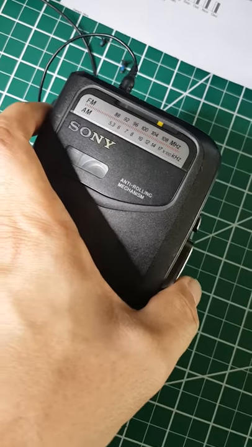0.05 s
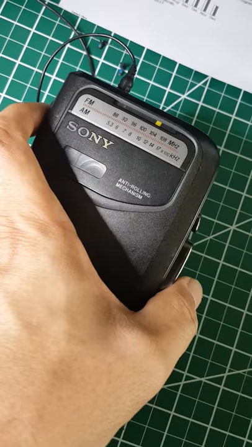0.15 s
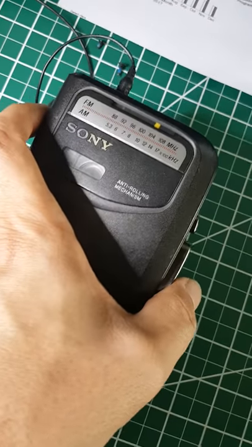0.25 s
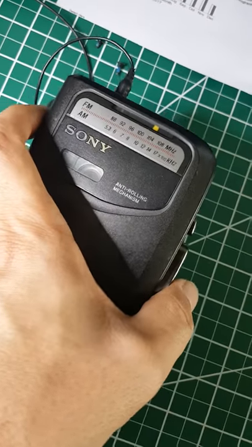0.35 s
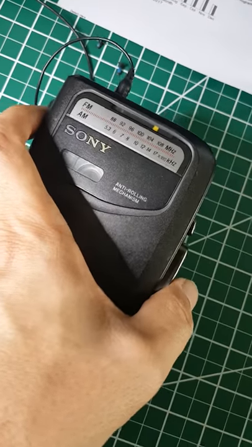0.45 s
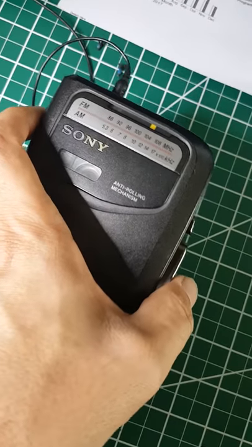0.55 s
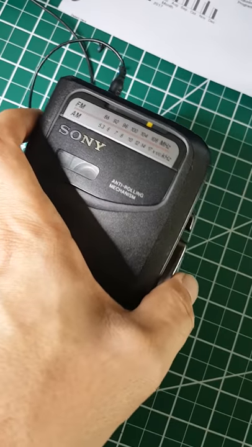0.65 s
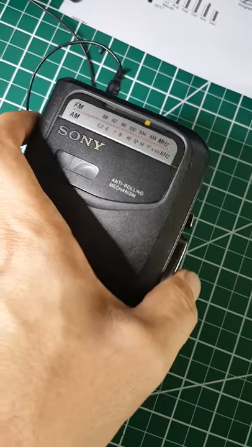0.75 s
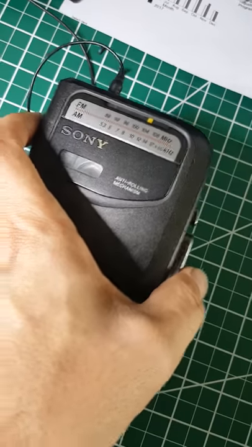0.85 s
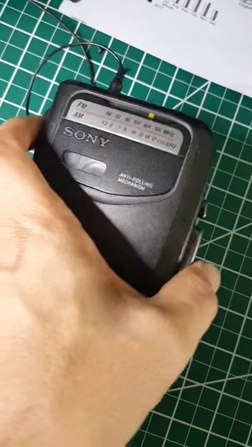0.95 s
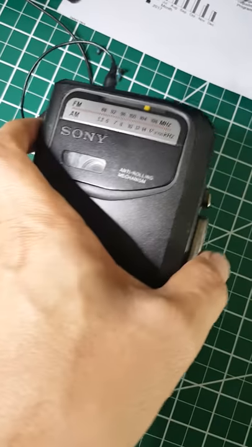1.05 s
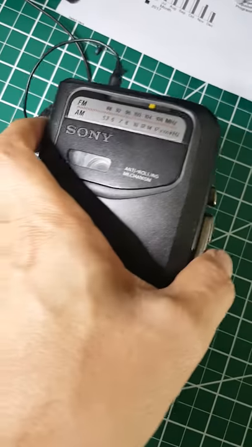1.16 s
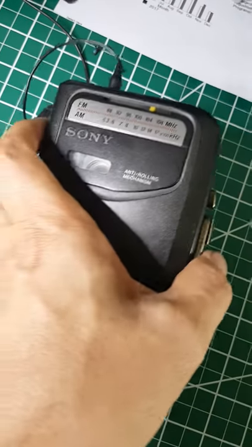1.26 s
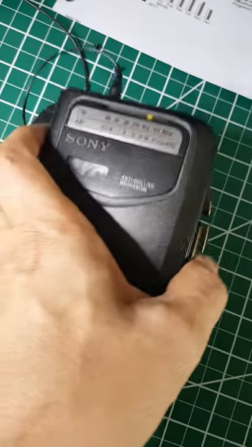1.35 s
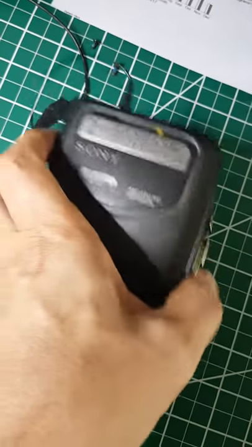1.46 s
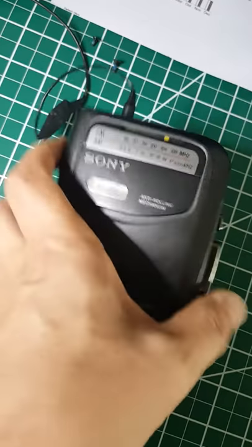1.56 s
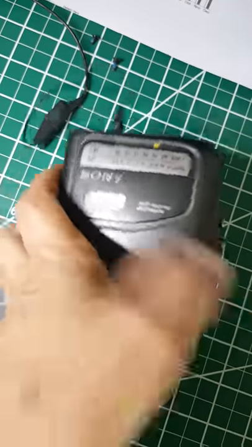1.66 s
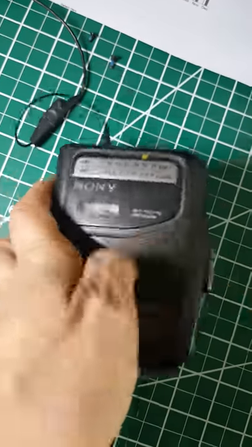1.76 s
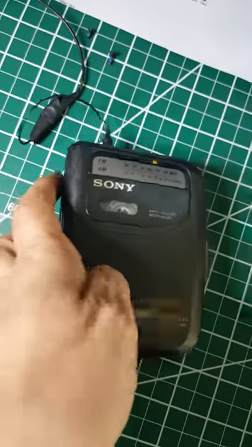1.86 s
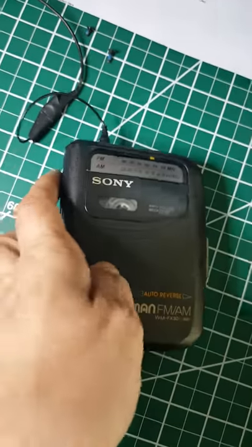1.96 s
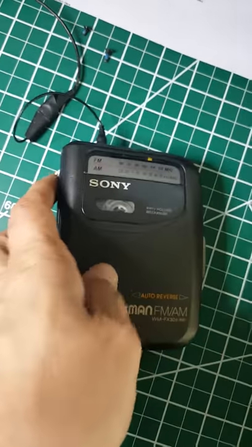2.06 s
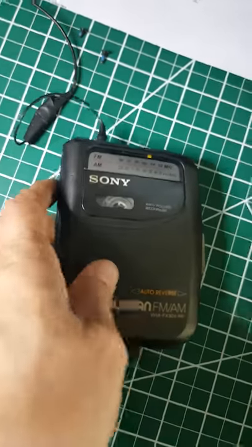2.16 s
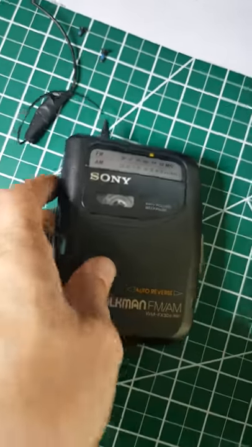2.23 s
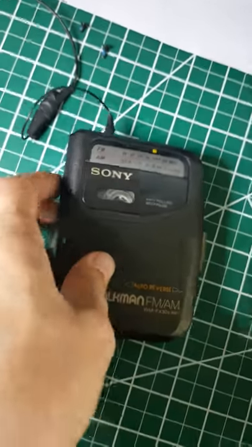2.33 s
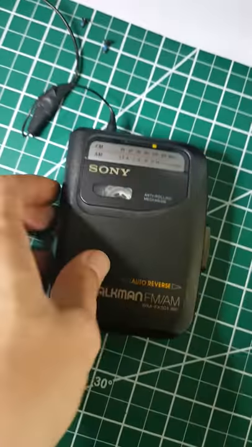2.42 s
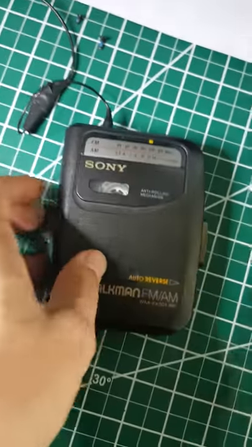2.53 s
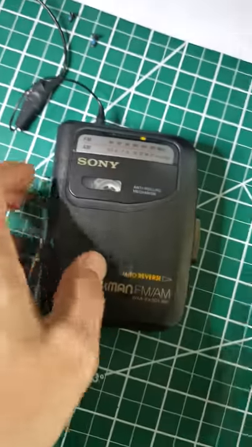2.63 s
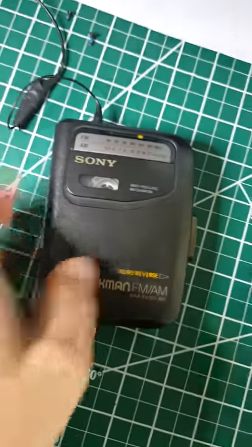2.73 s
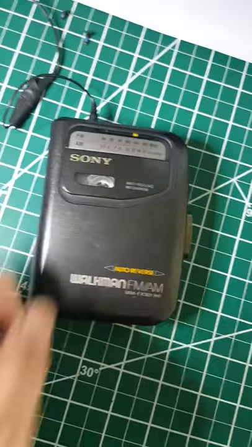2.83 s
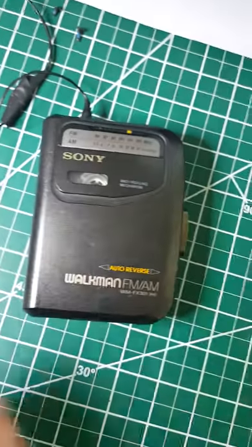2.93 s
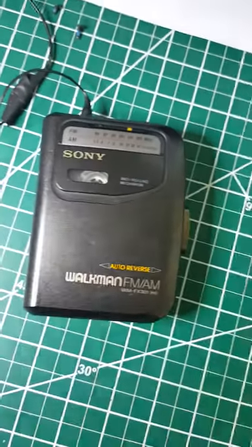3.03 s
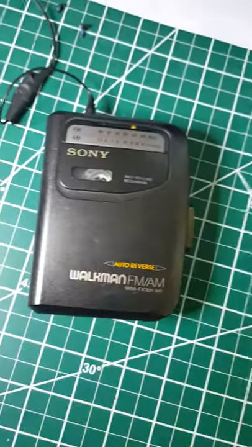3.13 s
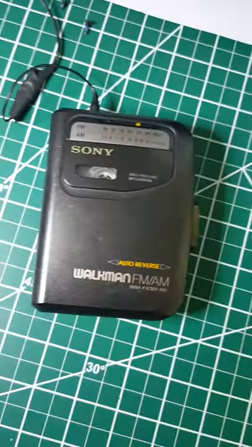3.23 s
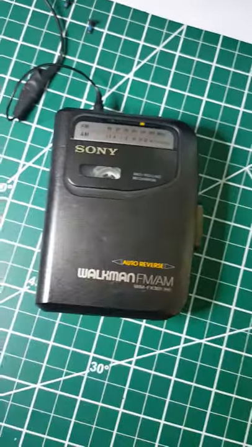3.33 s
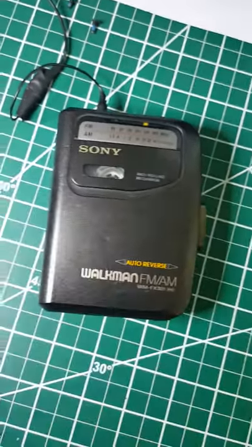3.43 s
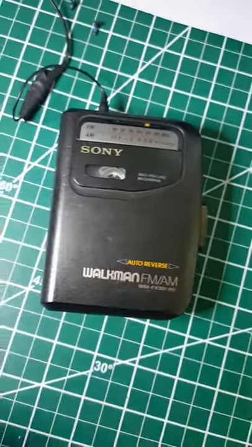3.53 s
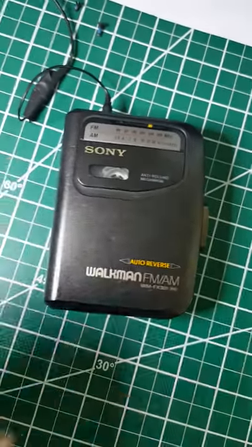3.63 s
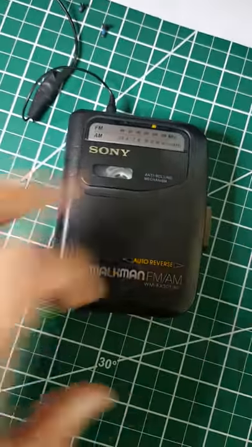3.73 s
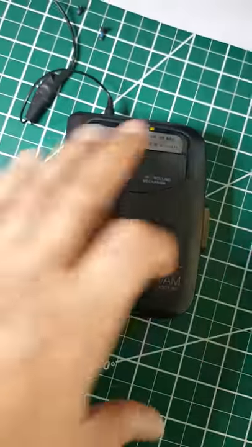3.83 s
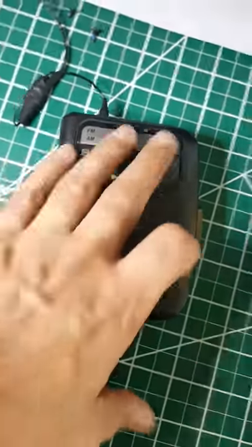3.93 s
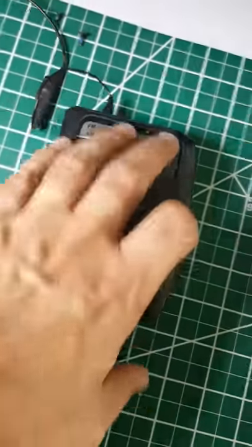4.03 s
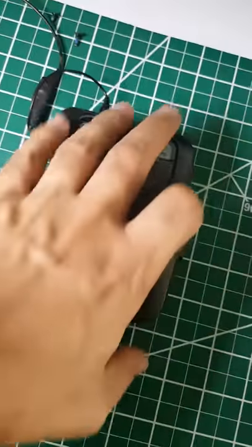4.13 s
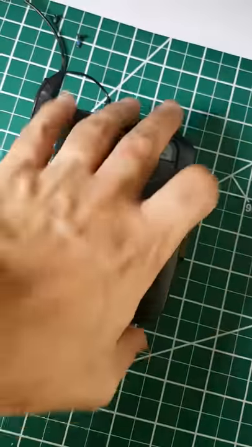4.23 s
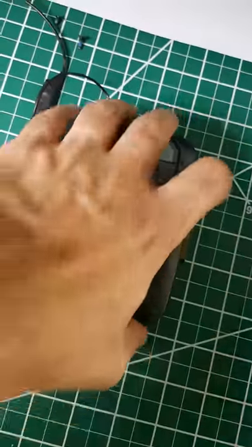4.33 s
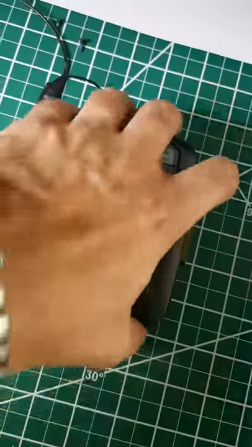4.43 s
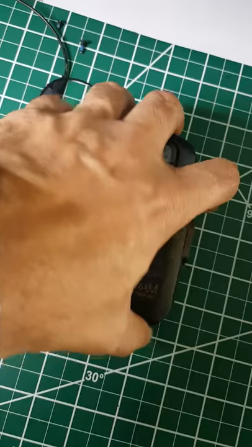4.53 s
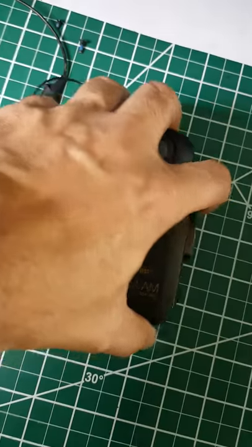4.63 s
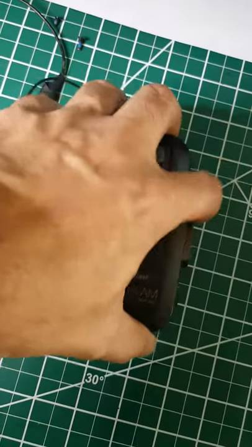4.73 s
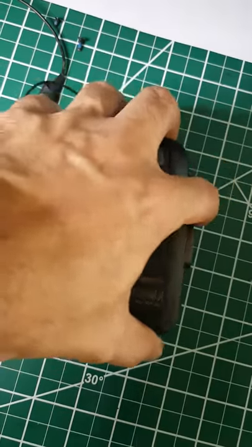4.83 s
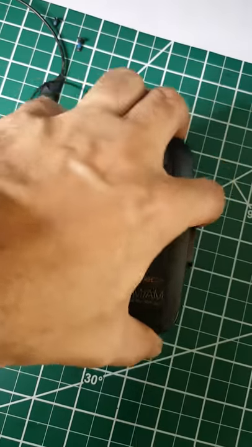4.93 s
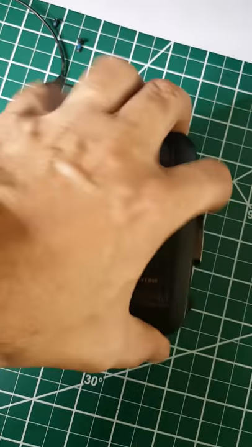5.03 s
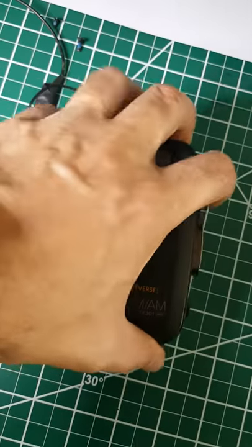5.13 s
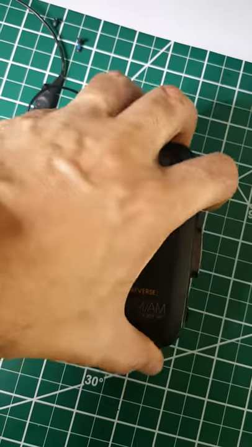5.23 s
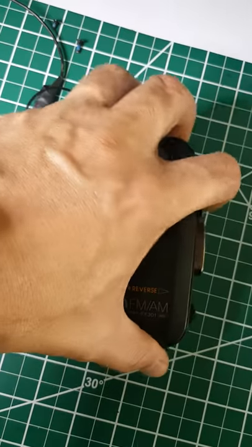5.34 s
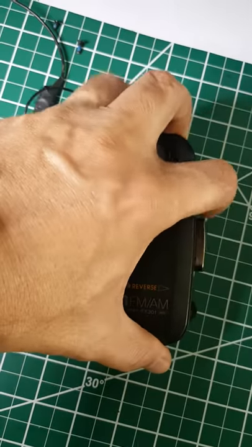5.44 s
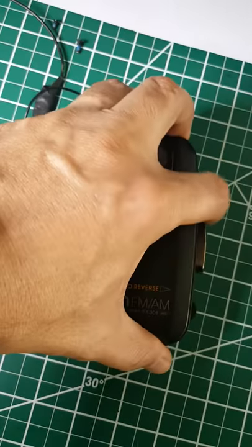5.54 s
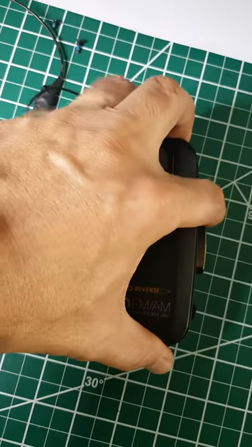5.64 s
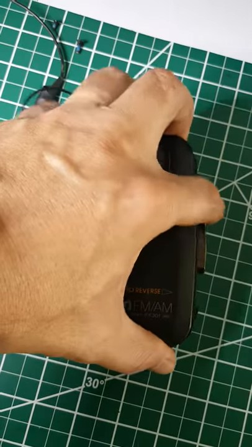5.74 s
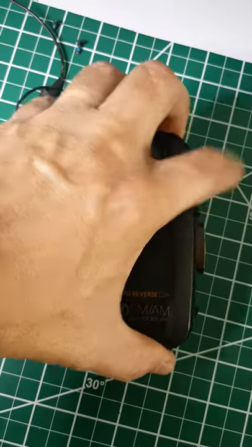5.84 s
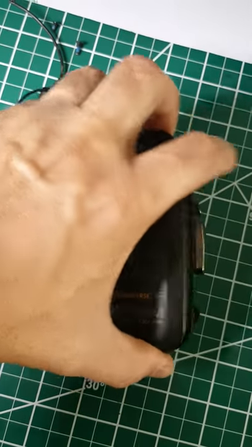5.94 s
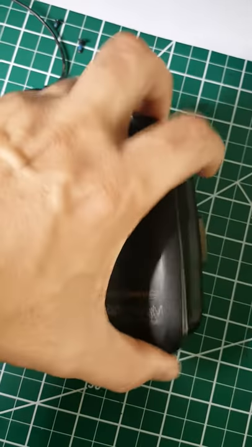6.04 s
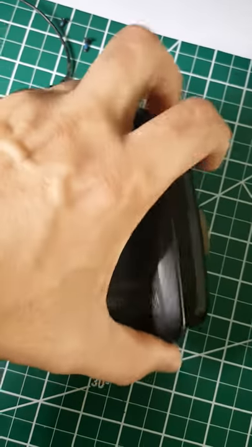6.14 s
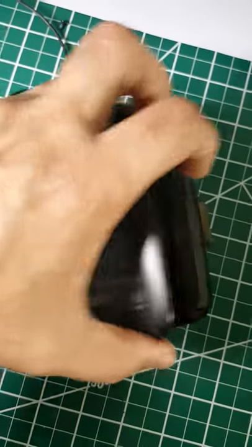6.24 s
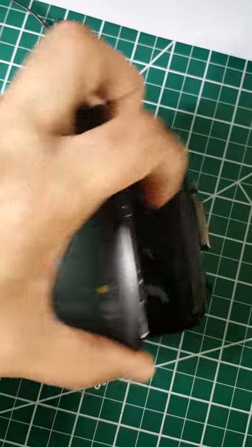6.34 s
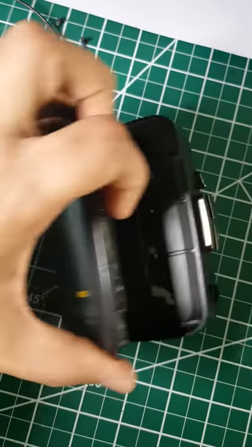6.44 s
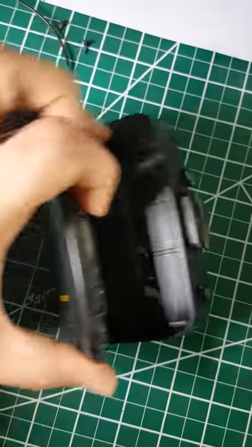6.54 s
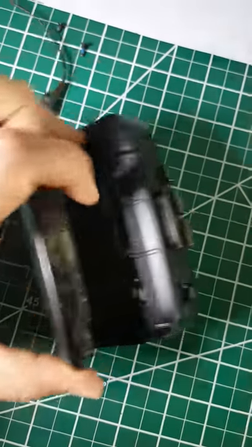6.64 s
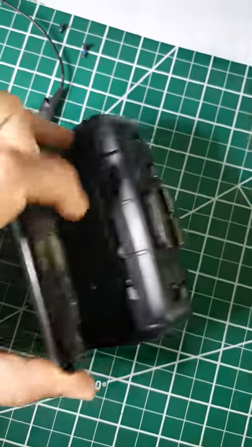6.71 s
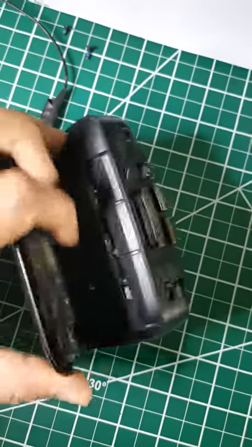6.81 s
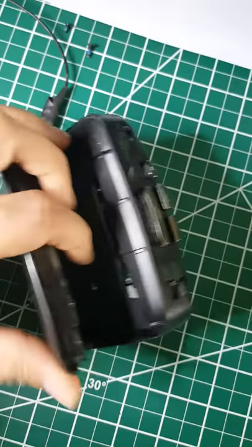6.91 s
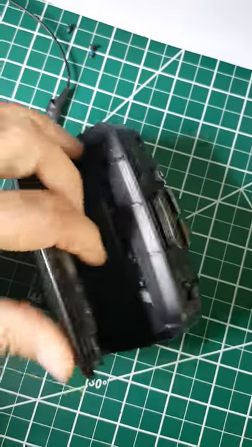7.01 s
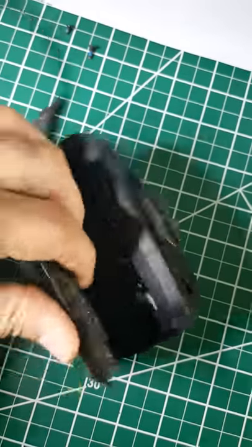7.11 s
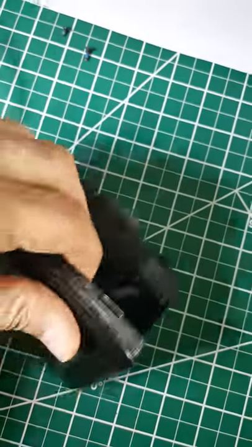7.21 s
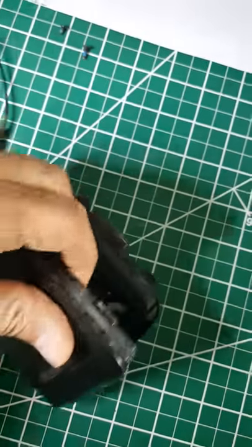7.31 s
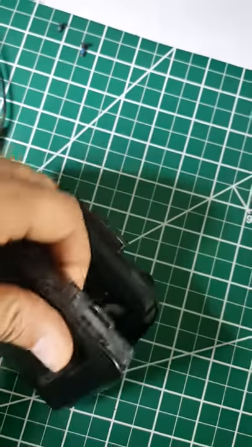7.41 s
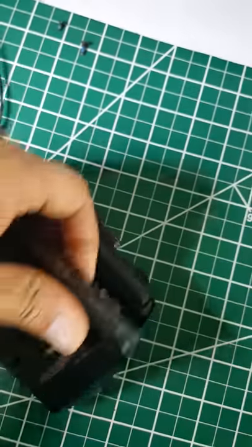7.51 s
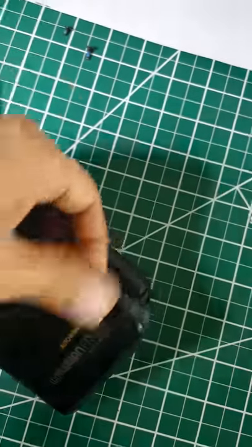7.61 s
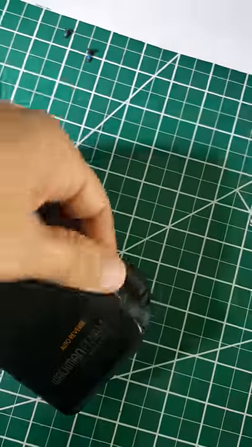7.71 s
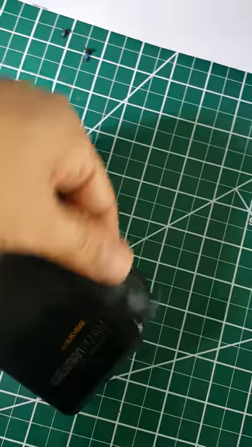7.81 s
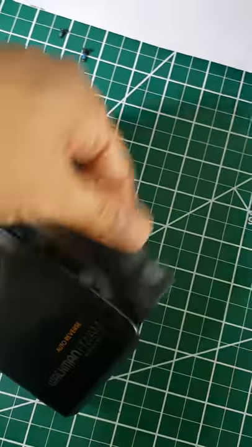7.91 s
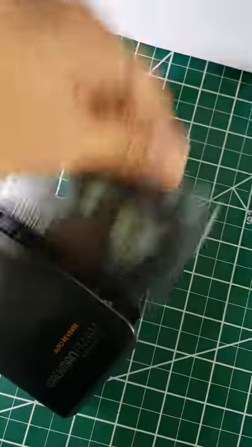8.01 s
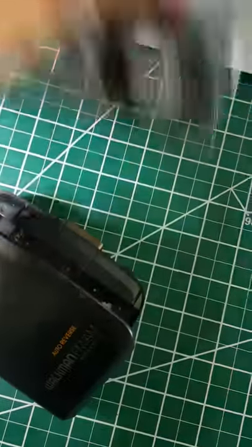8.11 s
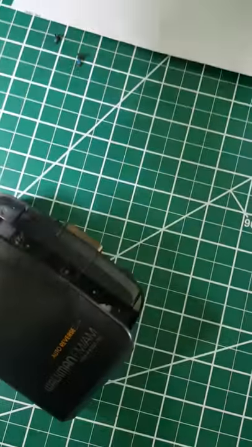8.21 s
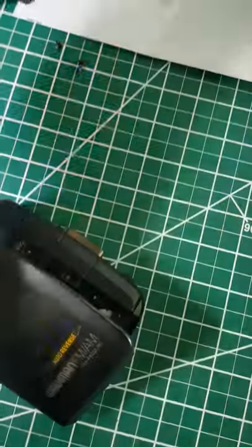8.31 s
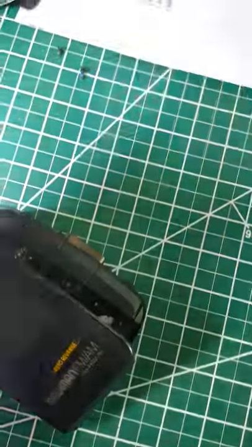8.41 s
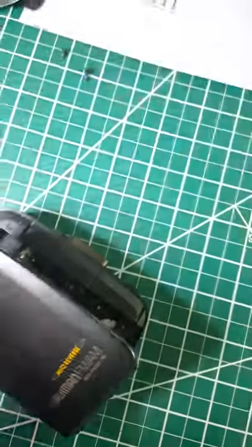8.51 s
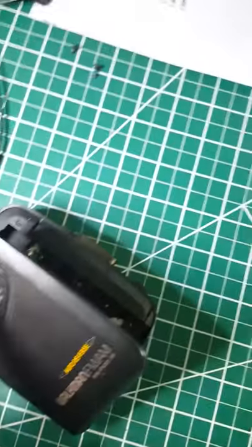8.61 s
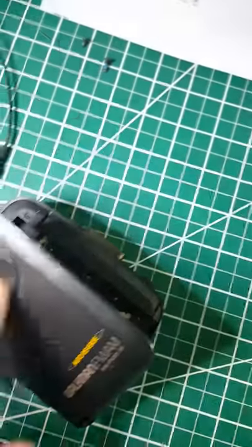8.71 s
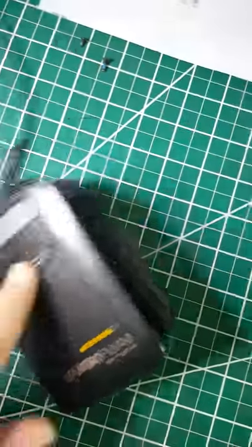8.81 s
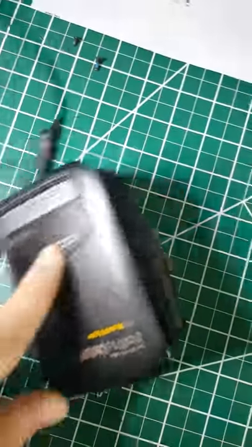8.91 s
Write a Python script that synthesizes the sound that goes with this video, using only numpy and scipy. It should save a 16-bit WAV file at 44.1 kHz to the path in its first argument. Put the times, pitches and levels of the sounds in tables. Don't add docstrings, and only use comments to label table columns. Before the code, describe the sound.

Steady tape hiss stops with a click; a hard plastic knock on a matted desk, light ticks, a sharp lid snap, then rattly handling.

```python
import sys
import numpy as np
from scipy import signal
from scipy.fft import rfft, irfft, next_fast_len
from scipy.io import wavfile

SR = 44100
rng = np.random.default_rng(int(sys.argv[2]) if len(sys.argv) > 2 else 0)


def inscribe(sig):
    pcm = np.round(np.clip(np.atleast_2d(sig).T, -1, 1) * 32767)
    wavfile.write(sys.argv[1], SR, pcm.astype(np.int16))


def rack_gain(trim_db):
    fader = np.asarray(trim_db, float)
    return 10 ** (fader / 20)


N = 395331

# frequency in Hz, level in dB, decay time T60 in seconds.
CASE_MODES = [(946, -8.5, 0.15), (1150, -4, 0.028), (1590, 5, 0.073), (1900, -2, 0.022),
              (2180, -6.5, 0.081), (2477, 4, 0.014), (4635, -32, 0.014)]
# frequency in Hz, level in dB, extra T60 in seconds.
SHELL_MODES = [(362, 0.5, 0.079), (600, -6, 0.016), (1000, -4.5, 0.02), (2000, 3.5, 0.021),
               (3000, 1, 0.023), (5400, -4.5, 0.03), (8640, -7.5, 0.031), (10400, -22, 0.011),
               (15200, -19.5, 0.035)]


def contacts():
    # start in seconds,
    # peak in dB, hardness in dB, weight in dB, loudest ring in Hz, chatter length in seconds.
    case_contacts = [(1.217, -45.5, -17, -3, 690, 0.0042), (1.32, -19.5, -12, -8.5, 1960, 0.002),
                     (1.426, -55, -27.5, -9, 1780, 0.0063), (1.477, -42, -15, -5, 2020, 0.013),
                     (1.499, -45, -18.5, -16, 940, 0.012), (1.538, -38.5, -22, -9, 760, 0.0039),
                     (1.753, -55, -21.5, -17, 970, 0.0061), (1.903, -4.5, -20, -12.5, 975, 0.0017),
                     (2.055, -31, -16, -10, 1680, 0.0027), (2.122, -31.5, -17, -22, 976, 0.0038),
                     (2.215, -44, -37.5, -10, 1590, 0.0028), (2.247, -28.5, -19, -18, 1900, 0.0017),
                     (2.272, -32, -17, -25, 890, 0.0017), (2.357, -30, -26.5, -23, 630, 0.015),
                     (2.381, -20.5, -27, -40, 850, 0.0074), (2.402, -14.5, -22, -27, 1227, 0.004),
                     (2.55, -51, -29, -12.5, 1330, 0.0058), (2.926, -54, -34, 2, 624, 0.0054),
                     (2.979, -60, -31.5, -8.5, 690, 0.0057), (3.934, -20.5, -24, -15.5, 900, 0.0042),
                     (4.33, -51, -24.5, -11.5, 960, 0.005), (4.357, -38.5, -35, -13, 930, 0.0058),
                     (4.454, -44.5, -14.5, -13.5, 1000, 0.0037), (4.511, -40.5, -45, -19, 1720, 0.0025),
                     (4.563, -44.5, -12, -36, 860, 0.0045), (4.588, -33.5, -55, -35, 940, 0.0035),
                     (4.62, -44, -16.5, -24, 1620, 0.01), (4.655, -37.5, -23, -33, 2160, 0.0034),
                     (4.677, -38, -52, -32, 1890, 0.0081), (4.769, -31, -23.5, -32, 2150, 0.0017),
                     (4.839, -29.5, -14.5, -46, 915, 0.0017), (4.9, -29.5, -18, -27, 925, 0.0023),
                     (4.944, -17, -21.5, -25, 1590, 0.0017), (5.002, -23.5, -59, -15, 2030, 0.0044),
                     (5.076, -28, -67, -15, 2180, 0.003), (5.151, -23.5, -18.5, -39, 2090, 0.0019),
                     (5.227, -54, -28.5, -15, 926, 0.005), (5.306, -40, -21.5, -20, 2180, 0.0021),
                     (5.37, -30, -17, -34, 2020, 0.0035), (5.433, -38, -21.5, -40, 940, 0.0093),
                     (5.468, -37.5, -20, -25, 1520, 0.0036), (5.499, -37.5, -16, -22, 1520, 0.0026),
                     (5.539, -38, -21, -26, 2210, 0.0035), (5.559, -39, -32, -23, 1880, 0.005),
                     (5.581, -31.5, -25.5, -36, 1620, 0.0021), (5.658, -27, -19, -14, 1830, 0.0022),
                     (5.682, -28.5, -20, -17, 1430, 0.013), (5.708, -27, -16.5, -42, 1570, 0.005),
                     (5.823, -26.5, -17, -42, 1950, 0.0017), (5.996, -26.5, -16, -20, 1644, 0.0046),
                     (6.04, -26.5, -14.5, -18, 1580, 0.013), (6.07, -3.5, -12, -20.5, 2530, 0.009),
                     (6.183, -19.5, -12.5, -36, 1590, 0.0017), (6.209, -20.5, -29, -13.5, 1224, 0.0081),
                     (6.283, -37, -35, -6, 1510, 0.0037), (6.394, -38, -17, -16, 1130, 0.015),
                     (6.434, -11.5, -3, -13.5, 1456, 0.0031), (6.701, -46, -20, -5.5, 1130, 0.0091),
                     (6.747, -44.5, -21.5, -14, 1040, 0.005), (6.822, -35.5, -18.5, -14, 1220, 0.01),
                     (6.868, -40.5, -24, -24, 1190, 0.005), (6.894, -42, -26.5, -26, 1210, 0.005),
                     (6.981, -49.5, -27, -24, 974, 0.005), (7.021, -60.5, -19, -16, 816, 0.005),
                     (7.073, -34, -17.5, -30, 930, 0.015), (7.153, -22, -11.5, -26, 2420, 0.0027),
                     (7.243, -36, -14, -26, 2970, 0.0074), (7.244, -19, -13.5, -45, 1500, 0.014),
                     (7.28, -31.5, -13.5, -29, 1510, 0.0055), (7.29, -19.5, -22.5, -32, 1510, 0.0074),
                     (7.569, -34.5, -21, -12, 1220, 0.0043), (7.639, -32, -12.5, -24, 1600, 0.0045),
                     (7.691, -49, -12.5, -14, 1420, 0.005), (7.712, -40, -33, -13, 1400, 0.003),
                     (7.755, -38, -22.5, -15, 1440, 0.015), (7.784, -23.5, -17.5, -38, 1200, 0.014),
                     (7.816, -28, -27.5, -27, 2630, 0.015), (7.852, -25.5, -22, -21, 1180, 0.015),
                     (7.934, -24, -29, -33, 1150, 0.0079), (7.949, -18.5, -27, -23, 1030, 0.011),
                     (8.01, -21.5, -23, -14, 1100, 0.0078), (8.2, -34, -8, -30, 1840, 0.0025),
                     (8.224, -41.5, -20.5, -20, 1710, 0.015), (8.256, -24, -16, -41, 1500, 0.0024),
                     (8.333, -50, -11, -19, 1380, 0.005), (8.524, -36.5, -33.5, -20, 810, 0.0066),
                     (8.572, -35, -15, -22, 1420, 0.005), (8.583, -26, -17, -20, 1460, 0.0034),
                     (8.602, -17, -11.5, -17, 1800, 0.0017), (8.757, -37.5, -6, -16, 1640, 0.015),
                     (8.84, -34.5, -10, -4, 1590, 0.015), (8.887, -37, -14, -26, 1190, 0.0084),
                     (1.359, -38, -22, -21, 1030, 0.0041), (1.679, -55, 1, 0, 654, 0.0055),
               (2.429, -29.5, -16.5, -10, 825, 0.0054), (2.519, -46, -16, -19, 613, 0.0034),
               (3.099, -51, -20.5, -7.5, 600, 0.005), (4.757, -37, -24, -36, 2230, 0.0057),
               (5.164, -29.5, -25, -19, 1550, 0.0033), (5.389, -40.5, -22, -30, 2010, 0.015),
               (5.721, -21.5, -19.5, -19, 1570, 0.0068), (5.739, -27.5, -12, -23.5, 1730, 0.0039),
               (6.073, -10, -17.5, -25, 1640, 0.005), (6.087, -13.5, -10, -24.5, 1510, 0.0064),
               (6.107, -13.5, -11.5, -23, 1540, 0.005), (6.627, -49, -13, -20, 724, 0.0036),
               (7.234, -28.5, -2.5, -9, 1460, 0.0049), (7.312, -33.5, -22.5, -30, 1630, 0.005),
               (7.874, -25, -23.5, -31, 1240, 0.007), (8.029, -27.5, -27.5, -34, 1570, 0.0047),
               (8.279, -43, -7, -21, 1500, 0.0033)]
    shell_likeness = 0.46
    size = 8192
    out = np.zeros((2, N + size))
    t = np.arange(3500) / SR
    bands = shell_bands(count=18)
    hz = bands[:, :1]
    case = responses(CASE_MODES, size)
    thicket = responses(bands, size)
    extra_t60 = at_hz(np.array(SHELL_MODES)[:, ::2], hz)
    alike = np.clip(shell_likeness, 0, 1) ** (hz / 1500)

    for s, peak_db, hard_db, weight_db, ring_hz, chatter_s in case_contacts:
        chatter_s = np.clip(chatter_s, .0005, .03)
        force = slips(len(t), 5000, uneven_db=3.0) * np.exp(-t / chatter_s) * 0.44
        force[0] = 1.0
        loose = signal.lfilter([1], [1, -.985], np.abs(slips(len(t), 450, uneven_db=3.0)))
        build_up = 1 - np.exp(-t / (0.27 * chatter_s))
        rattle = build_up * (.5 + .35 * loose + np.abs(force))

        point_db = 5.5 * rng.standard_normal(len(CASE_MODES))
        ear_db = 0.7 * rng.standard_normal((2, len(CASE_MODES)))
        gains = rack_gain(-15.5 + point_db + ear_db)
        clear = gains @ case + rack_gain(5.5) * responses([(ring_hz, 0, .028)], size)

        colour_db = (hard_db + 19) * np.clip(np.log2(hz / 2400), 0, 1)
        colour_db += (weight_db + 9) * np.clip(np.log2(1000 / hz), 0, 1)
        colour_db += 7.2 * np.exp(-(np.log2(hz / ring_hz) / .45) ** 2)
        dying = rack_gain(colour_db - 12 - 60 * t / (extra_t60 + 3.32 * chatter_s))
        mid, side = rng.standard_normal((2, len(hz), len(t))) * dying * rattle
        pair = [np.sqrt(1 + alike) * mid + sign * np.sqrt(1 - alike) * side for sign in (1, -1)]

        dense = (rfft(pair, size) * thicket).sum(axis=1)
        sound = irfft(rfft(force, size) * clear + dense, size)
        at = round(s * SR)
        out[:, at:at + size] += sound * rack_gain(peak_db + 0.5) / np.abs(sound).max()
    return out[:, :N]


def lid():
    # start in seconds, peak in dB.
    kicks = [(5.707, -31), (5.7374, -36.5), (6.0432, -38.5), (6.0736, -17.5), (6.0871, -13.5),
             (6.1174, -26), (6.1428, -31.5), (6.1843, -32.5), (6.4354, -27), (7.2434, -35.5), (7.2887, -23),
             (8.2546, -37)]
    # frequency in Hz, level in dB, T60 in seconds.
    lid_modes = [(1428, -4, .07), (1486, 0, .085), (1575, -3, .06), (1680, -6, .06), (2500, -14, .08)]
    force = np.zeros(N)
    for s, peak_db in kicks:
        rattle = slips(900, 3000, uneven_db=1.5) * np.hanning(900)
        force[round(s * SR):][:900] += rack_gain(peak_db - 20) * rattle
    return signal.fftconvolve(force, impulse(lid_modes, size=16384))[:N]


def rub():
    # time in seconds, base in dB, panels in dB,
    # fine hiss in dB.
    strokes = [
        [(0.02, -94.5, -69.5, -98), (0.162, -56, -52.5, -75), (0.4, -69, -66, -80)],
        [(1.9, -64.5, -80, -76), (1.984, -61.5, -53, -77.5), (2.064, -62.5, -65, -79.5),
         (2.354, -64.5, -83, -74), (2.6, -65.5, -78.5, -87)],
        [(3.93, -51, -64, -62.5), (4.2, -79.5, -78, -84)],
        [(4.5, -63.5, -64, -80), (4.754, -63.5, -63.5, -76), (5.0, -64, -66, -69.5), (5.16, -65, -76, -84),
         (5.422, -73, -63, -76), (5.564, -72, -58, -75), (5.64, -68, -85, -87), (5.798, -65, -78, -83.5),
         (6.0, -76, -72, -79.5)],
        [(6.07, -68, -66, -78.5), (6.166, -59, -54, -80.5), (6.258, -65.5, -58.5, -73),
         (6.6, -68.5, -62.5, -76.5)],
        [(6.8, -64, -75, -84), (7.14, -63, -52, -55.5), (7.24, -66, -35, -66.5), (7.36, -72, -58, -87),
         (7.61, -70, -60.5, -62), (7.79, -60, -63.5, -100), (7.91, -57, -52, -55), (8.03, -76, -82, -72),
         (8.35, -75, -61.5, -70.5), (8.63, -65.5, -81.5, -72.5), (8.78, -79, -55, -69), (8.96, -61, -62.5, -53)],
    ]
    # frequency in Hz, density in dB per Hz.
    grain_spectrum = [(1760, -35), (3000, -3.5), (3260, -7.5), (7890, -4.5), (10000, -14.5), (16000, -14.5)]
    t = np.arange(N) / SR
    levels = np.zeros((3, N))
    for stroke in strokes:
        s, *columns = np.transpose(stroke)
        levels += [rack_gain(np.interp(t, s, db, -200, -200)) for db in columns]

    gripped_case = np.array(CASE_MODES) * [1, 1, .4]
    held = np.vstack([gripped_case, shell_bands(count=20)[2:13] + [0, 2.0, 0]])
    is_base = held[:, 0] < 1250
    out = levels[2] * diffuse(grain_spectrum) * rack_gain(2.8 * drift(14))
    for level, part in zip(levels, (is_base, ~is_base)):
        shared, left, right = (slips(N, 5000, uneven_db=2.8) for k in range(3))
        force = (shared + 1.6 * np.array([left, right])) * rack_gain(1.0 * drift(23))
        ringing = signal.fftconvolve(force, [impulse(held[part], size=4096)], axes=1)[:, :N]
        out += level * rms_one(ringing)
    return out


def thumps():
    # start in seconds, peak in dB.
    knocks = [
        (1.31, -46.5),
        (1.9, -17),
        (2.377, -29.5),
        (2.403, -32),
        (3.935, -42),
        (4.941, -44.5),
        (5.074, -39),
        (6.071, -21),
        (6.209, -37),
    ]
    # frequency in Hz, level in dB, T60 in seconds.
    desk_modes = [(108.6, 4, 0.31), (90, -8.5, .2), (185, -1.5, 0.14), (250, -4, 0.12)]
    force = np.zeros(N)
    force[[round(s * SR) for s, db in knocks]] = -rack_gain(np.array(knocks)[:, 1] - 5.5)
    push = signal.sosfilt(signal.butter(3, [75, 300], "band", fs=SR, output="sos"), force)
    return signal.fftconvolve(push, impulse(desk_modes, size=32768))[:N]


def to_microphones(pair):
    # time in seconds, left-right difference in dB.
    places = [
        (1.2, 1.5),
        (2.62, -1),
        (3.86, -1.0),
        (5.09, 1),
        (8.96, 0),
    ]
    right_late = 6
    pan_db = np.interp(np.arange(N) / SR, *np.transpose(places))
    late = np.roll(pair[1], right_late)
    small = signal.butter(3, 260, "high", fs=SR, output="sos")
    return signal.sosfilt(small, np.array([pair[0], late]) * rack_gain([pan_db / 2, -pan_db / 2]))


def room(x):
    t60_s, dull_hz, onset_s = 0.21, 6500, 0.0054
    t = np.arange(SR // 2) / SR
    tail = rng.standard_normal((2, len(t))) * rack_gain(-60 * t / t60_s) * np.clip(t / onset_s, 0, 1)
    tail = signal.sosfilt(signal.butter(1, [400, dull_hz], "band", fs=SR, output="sos"), tail)
    return signal.fftconvolve(x, tail / np.sqrt(np.sum(tail ** 2) / 2), axes=1)[:, :N]


def player_hiss():
    # frequency in Hz, density in dB per Hz.
    hiss_spectrum = [(180, -27), (300, -3), (392, -3.5), (455, -10.5), (678, -5), (842, -19), (1150, -16),
                     (1780, -12.5), (5080, -19), (8500, -13), (9880, -26.5), (11900, -15), (16000, -31)]
    level_db, stop_s, fade_s = -60, 1.325, 0.015
    running = np.clip((stop_s - np.arange(N) / SR) / fade_s, 0, 1)
    return rack_gain(level_db + .6 * drift(6)) * running * diffuse(hiss_spectrum)


def background():
    # frequency in Hz, density in dB per Hz.
    rumble_spectrum = [(18, -47), (30, -27.5), (48, -18), (64, -9.5), (92, -8.5), (123, -1), (137, -10.5),
                       (158, -24), (195, -11), (231, -15), (286, -27), (372, -30.5), (402, -20.5),
                       (465, -33.5), (700, -39), (910, -69.5), (1540, -120)]
    # frequency in Hz, density in dB per Hz.
    air_spectrum = [(250, -32), (420, -4), (600, -3), (750, -4), (820, -7), (2310, -15), (2610, -17),
                    (6320, -23), (9500, -28), (13000, -27), (16000, -25)]
    rumble_db, air_db, whine_db, whine_hz = -52, -66.5, -95, 12300
    whine = rack_gain(whine_db + 2.5 * drift(13)) * np.sin(2 * np.pi * whine_hz * np.arange(N) / SR)
    rumble = rack_gain(rumble_db + 0.5 * drift(7.5)) * diffuse(rumble_spectrum)
    air = rack_gain(air_db + .7 * drift(4)) * diffuse(air_spectrum)
    return rumble + air + whine


def slips(count, per_s, uneven_db):
    mark, size, sign = rng.random((3, count))
    return (mark < per_s / SR) * rack_gain(-uneven_db * np.log(size + 1e-3)) * np.sign(sign - .5)


def shell_bands(count):
    hz = np.geomspace(350, 15000, count)
    return np.transpose([hz, at_hz(SHELL_MODES, hz) + 10 * np.log10(hz / 1000), 11.0 / hz])


def responses(modes, size):
    hz, db, t60 = np.transpose(modes)[:, :, None]
    r = rack_gain(-60 / (np.maximum(t60, .003) * SR))
    w = 2 * np.pi * hz / SR
    z = np.exp(-2j * np.pi * np.fft.rfftfreq(size))
    return rack_gain(db) * np.sin(w) * z / (1 - 2 * r * np.cos(w) * z + r * r * z * z)


def impulse(modes, size):
    return irfft(responses(modes, size).sum(axis=0), size)


def diffuse(spectrum):
    # frequency in Hz, correlation from -1 to 1.
    likeness = [(60, 0.8), (180, 1), (550, -0.69), (1650, 0.21), (4970, -0.56), (15000, -0.039)]
    size = next_fast_len(N)
    hz = np.fft.rfftfreq(size, 1 / SR)
    mid, side = rfft(rng.standard_normal((2, size)), axis=1) * rack_gain(at_hz(spectrum, hz))
    alike = np.clip(at_hz(likeness, hz), -1, 1)
    pair = np.sqrt(1 + alike) * mid + np.sqrt(1 - alike) * side * np.array([[1], [-1]])
    return rms_one(irfft(pair, size, axis=1)[:, :N])


def drift(rate_hz):
    steps_per_s = 60
    steps = rng.standard_normal(int(N / SR * steps_per_s) + 2)
    smooth = signal.butter(1, np.clip(rate_hz, .1, 25), fs=steps_per_s, output="sos")
    slow = signal.sosfiltfilt(smooth, steps)
    return np.interp(np.linspace(0, len(slow) - 1, N), np.arange(len(slow)), rms_one(slow))


def at_hz(points, hz):
    points = np.array(points)
    return np.interp(np.log(hz + 1), np.log(points[:, 0]), points[:, 1])


def rms_one(x):
    return x / np.sqrt(np.mean(x ** 2) + 1e-20)


def scene():
    case = to_microphones(contacts() + lid() + rub())
    room_db = -13
    return case + rack_gain(room_db) * room(case) + thumps() + player_hiss() + background()


def low_pass(x):
    return signal.sosfilt(signal.butter(12, 16640, fs=SR, output="sos"), x)


def record(dry):
    top = signal.butter(8, 15900, fs=SR, output="sos")
    mix = signal.sosfilt(top, dry)
    return low_pass(mix)


dry = scene()
out = record(dry)
inscribe(out)
```